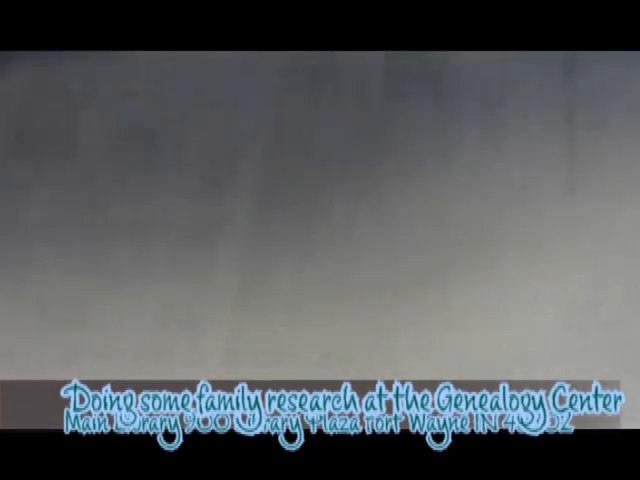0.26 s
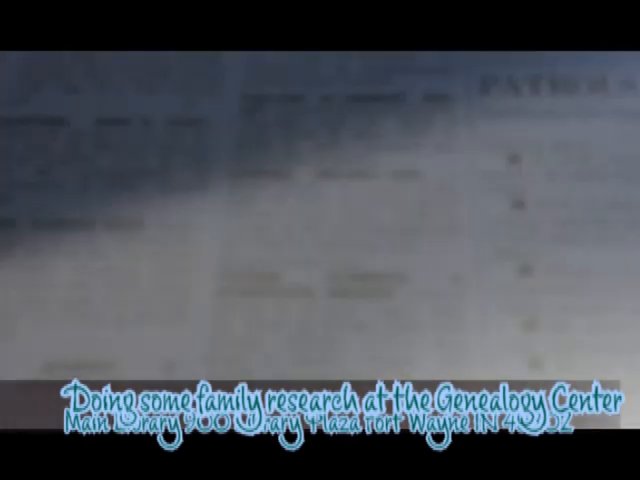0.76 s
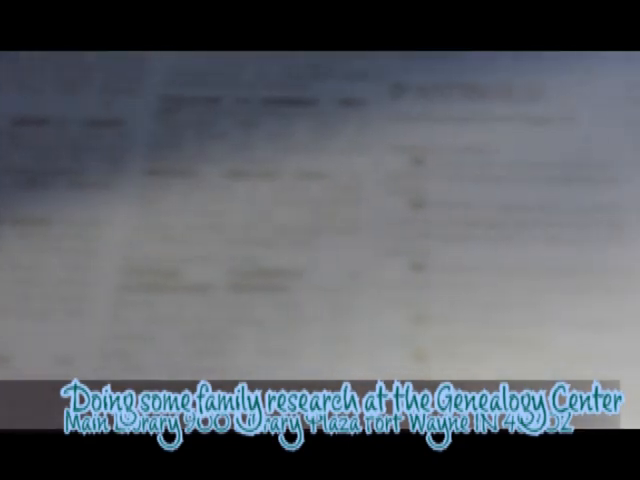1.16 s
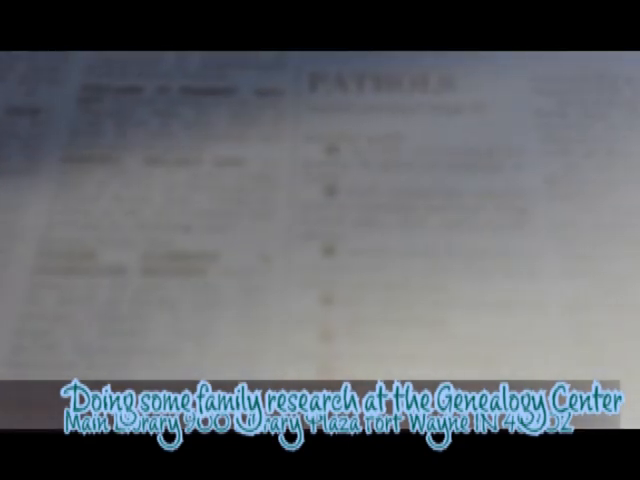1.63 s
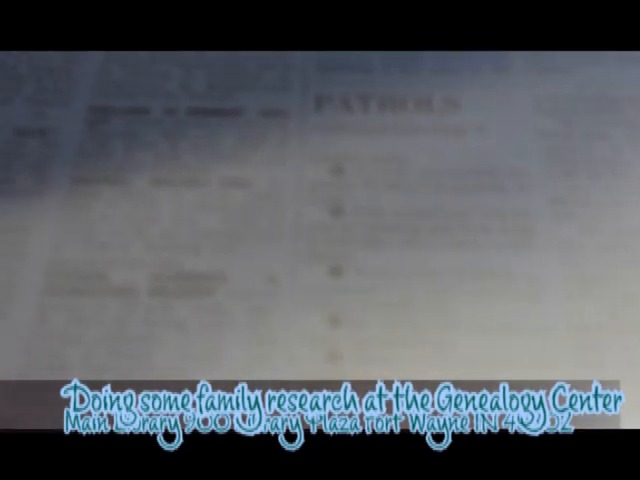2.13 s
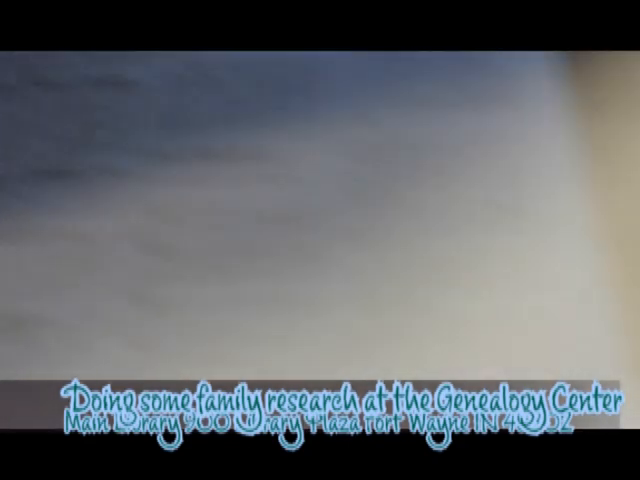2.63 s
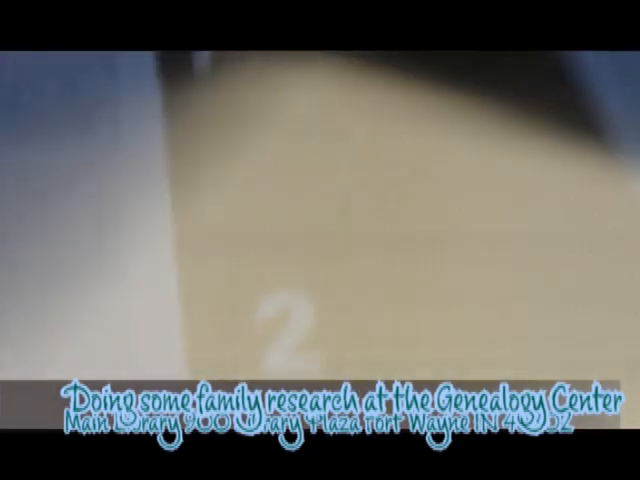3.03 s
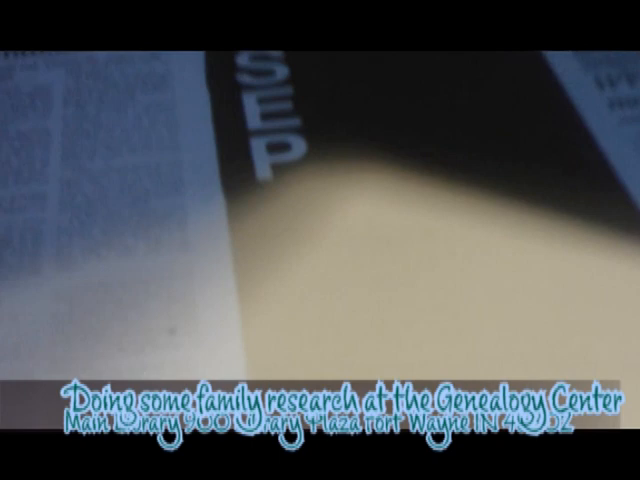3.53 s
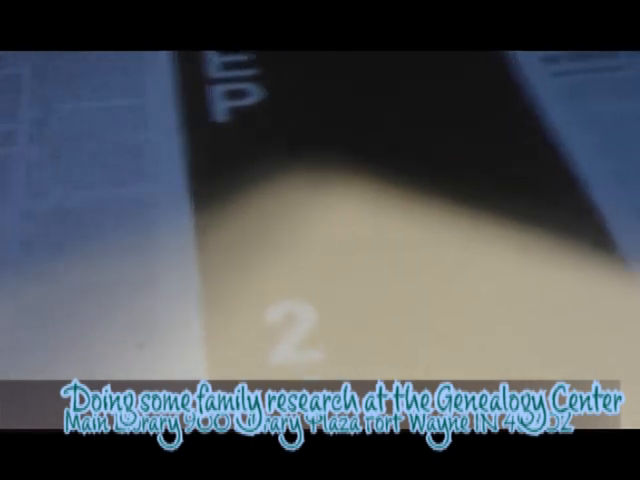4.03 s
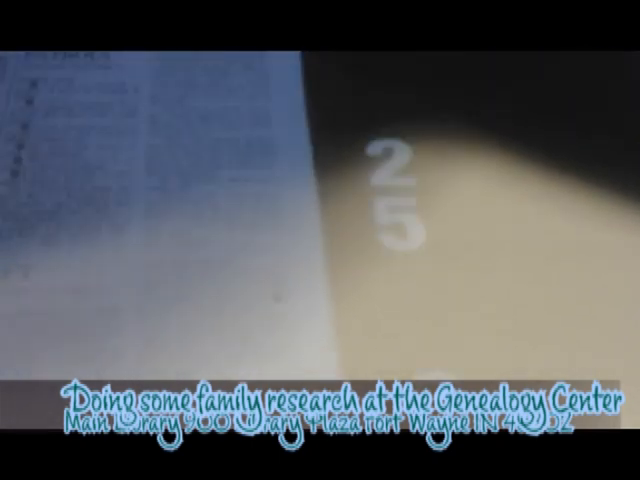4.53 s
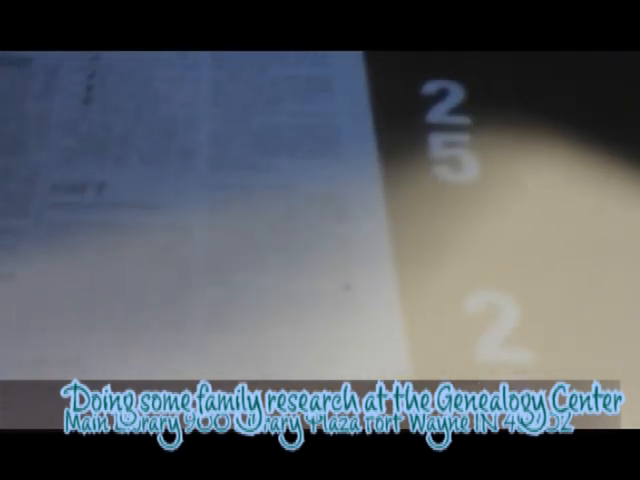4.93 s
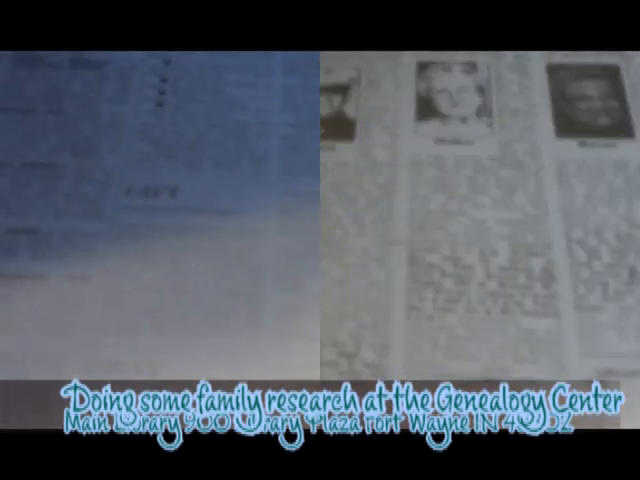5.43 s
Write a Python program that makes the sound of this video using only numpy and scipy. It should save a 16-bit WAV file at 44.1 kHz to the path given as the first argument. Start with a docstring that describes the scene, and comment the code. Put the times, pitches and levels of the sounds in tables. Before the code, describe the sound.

A microfilm reader is handled close to the microphone in a quiet room, over a faint steady fan, motor hum and thin pulsing whine. At about 0.3 seconds its plastic lever snaps back sharply, followed by small knocks and soft rubbing of a hand on the casing. Light finger ticks continue, with a soft carriage bump at 1.4 seconds and a short slide around 2.3. The carriage bumps hollowly at 3.4 and 3.6 seconds. Fingers rub and scuff from about 4.3 to 4.8. Just after 5 seconds the carriage slides again and a stiff switch clicks, then clacks over onto a ringing sprung latch at 5.3, the loudest moment, slightly overloading. The sound drops out briefly at 5.4 seconds, returning with a second lever snap at 5.5, a small button tap at 5.6 and a last light click.

```python
"""A microfilm reader, close to the microphone in a quiet room: its plastic lever snaps back twice and
a stiff switch clacks over onto a sprung latch, each blow ringing the part and its hollow casing.
Between the snaps a hand rubs and ticks on the plastic and the film carriage slides and bumps.
Under it all lie a fan, a motor hum and a faint pulsing whine. The hardest clack overloads,
and the sound drops out for a moment just before the second snap of the lever."""
import sys
import numpy as np
from scipy import signal
from scipy.fft import rfft, irfft
from scipy.io import wavfile

SR = 44100
rng = np.random.default_rng(int(sys.argv[2]) if len(sys.argv) > 2 else 0)


def master(y):
    """Save y as 16-bit WAV."""
    cut = np.clip(np.atleast_2d(y).T, -1, 1)
    pcm = np.round(cut * 32767)  # scale
    wavfile.write(sys.argv[1], SR, pcm.astype(np.int16))


N = 250047
TIME = np.arange(N) / SR

# Air noise of the fan. Each row: frequency in Hz, relative level in dB.
FAN_SPECTRUM = [(24, -63), (40, -22.5), (86, -12.5), (110, -8), (182, -5), (280, -8), (402, -9),
                (499, -20.5), (536, -6.5), (650, -16.5), (2010, -25), (2500, -24), (4340, -28.5),
                (12500, -33.5), (16200, -50.5), (22000, -120)]
# Hum of its motor. Each row: frequency in Hz, level in dB.
HUM_LINES = [(119, -68.5), (178, -67), (360, -70), (403, -70), (538, -86.5)]

# Resonances of the reader's parts. Each row: frequency in Hz, width in Hz, relative level in dB.
PLASTIC_MODES = [(687, 130, 4), (1628, 170, 7.5), (2608, 370, 8.5), (3030, 220, -8), (3274, 430, -5),
                 (4800, 330, -6.5), (6700, 1000, -43), (11130, 3500, -27.5)]
FILM_MODES = [(3640, 400, 4), (4830, 1100, 3), (6500, 750, 0.5), (8860, 4400, -8.5), (10700, 1500, -11)]
CASING_MODES = [(215, 280, 0), (428, 91, -0.4), (670, 400, 0.77)]  # the hollow shell behind the controls
LEVER_MODES = [(385, 45, -6), (835, 123, -1), (961, 61, -5), (1405, 124, 0), (1600, 210, -14),
               (2464, 62, -8), (2593, 77, -11), (3352, 146, -12), (3534, 87, -23), (5539, 405, -26),
               (6363, 340, -26), (6667, 121, -32), (7489, 1200, -36), (10435, 1200, -36), (11339, 179, -45)]
CARRIAGE_MODES = [(439, 17, 2), (487, 28, 2), (572, 42, -3), (640, 13, -13), (1295, 300, -14),
                  (1520, 290, -19.5), (2515, 140, -14), (3840, 680, -24.5), (5200, 340, -28)]
STAND_MODES = [(102, 25, 2), (163, 35, 2), (231, 92, 7.1), (346, 120, 2.7)]  # under the carriage
RAIL_MODES = [(441, 38, 5), (650, 96, 2), (1500, 57, -6), (1640, 90, -4), (2640, 530, -9), (3240, 410, -20),
              (4080, 220, -15), (5320, 390, -22.5), (6100, 830, -27)]  # the carriage while it slides
SWITCH_MODES = [(419, 307, -12), (696, 602, -4), (1688, 1064, -8), (1500, 110, -6), (2520, 150, 3),
                (2800, 250, 0), (3270, 120, -7), (3912, 283, -27), (4978, 289, -10), (5941, 166, -25),
                (7479, 90, -29), (10230, 1200, -37)]
LATCH_MODES = [(767, 47, -5), (1505, 60, 1), (1756, 45, -3), (2010, 80, -2), (2472, 45, -6),
               (2720, 130, -4), (3000, 345, -1), (3627, 89, -10), (4299, 243, -15), (4679, 45, -14),
               (5669, 45, -12), (6373, 161, -11), (6734, 92, -20), (7647, 70, -12), (10924, 174, -20),
               (11478, 285, -25)]
SPRING_MODES = [(1470, 27, -18), (2850, 44, 8), (7800, 25, -12.5), (11800, 18, -7.5)]
BUTTON_MODES = [(820, 137, 5.5), (2550, 210, -11), (5850, 1600, -19.5), (7200, 470, -18), (9300, 820, -51)]

# Strokes of the hand. Each row: start, rise, hold and fall in seconds, level in dB,
# then casing rumble and film hiss in dB relative to that level.
HAND_STROKES = [(0.034, 0.13, 0.23, 0.18, -61.5, -3.5, -0.5), (0.428, 0.12, 0.19, 0.21, -50.5, -9, -14),
                (0.944, .2, 0.05, 0.24, -69.5, -4, -16), (2.241, 0.128, 0.029, 0.026, -48.5, -20, -17),
                (2.522, 0.27, 0.056, .28, -57.5, 0.5, -3.5), (4.342, .11, .01, 0.14, -57, -9, -27),
                (4.511, 0.1, 0.24, 0.11, -56, -2, -20), (4.972, .07, 0.036, 0.066, -59.5, -1.5, -15),
                (5.096, 0.18, 0.059, 0.04, -51, 6.5, -7), (5.526, 0.14, .04, 0.055, -61, 4, -20)]
# Runs of the carriage. Each row: start, rise, hold and fall in seconds, level in dB, relative rumble in dB.
CARRIAGE_RUNS = [(2.065, 0.259, 0.066, 0.055, -44, -15), (5.093, 0.14, .008, 0.0094, -40.5, -21.5)]
# Fingers catching on the plastic. Each row: start in seconds, level in dB over 10 ms, chatter in seconds.
FINGER_SCUFFS = [(.206, -53.5, .0027), (.366, -50, 0.0044), (0.867, -50, 0.0012), (.878, -51, 0.0026),
                 (1.027, -51, 0.00039), (1.708, -56, 0.0023), (2.1328, -51.5, 0.0022),
                 (2.3713, -45, 0.0016), (2.8525, -52, 0.0019), (3.013, -56.5, 0.00068),
                 (3.366, -43, 0.0031), (3.397, -42.5, 0.007), (3.582, -51, 0.0024), (3.811, -48.5, 0.0022),
                 (4.0642, -53, 0.0051), (4.61, -47, 0.0032), (4.644, -43.5, 0.0047), (4.675, -40, 0.0057),
                 (4.762, -39.5, 0.0049), (4.825, -49, 0.011)]

# Ticks, knocks and snaps. Each row: start in seconds, level in dB over 10 ms.
NAIL_TICKS = [(0.2375, -47), (1.4424, -64), (1.66, -61)]
LEVER_KNOCKS = [(0.2442, -50.5), (.3795, -46.5), (0.4126, -38), (1.0752, -52), (5.2235, -40), (5.3195, -40),
                (5.332, -41.5)]
LEVER_SNAPS = [(0.2825, -16.5), (5.4996, -18)]

# Blows on each part. Each row: start in seconds, level in dB over 10 ms, hardness as a treble cutoff
# in Hz, thud of the mount in dB relative to the clack, chatter in seconds.
CARRIAGE_BUMPS = [(1.3902, -42.5, 8000, -29, 0.0031), (1.396, -41.5, 654, -27, 0.019),
                  (3.378, -30.5, 4500, -10, 0.0058), (3.39, -38, 2000, 8, 0.019),
                  (3.582, -38, 2200, 1.5, 0.011), (3.62, -38.5, 925, 7, 0.017)]
SWITCH_CLACKS = [(5.1463, -38, 3830, -33, 0.0022), (5.2022, -41, 12000, -7, 0.00048),
                 (5.2236, -23, 5970, -14, 0.00013), (5.2695, -29, 12170, -18, 0.00075),
                 (5.2724, -15.5, 13000, -16.5, 0.001), (5.6452, -43, 6000, -32, 0.00092)]
LATCH_HITS = [(5.2853, -21.5, 3595, -10, 0.0026), (5.2925, -24.5, 15250, -13, 0.0012),
              (5.2936, -9, 15260, -35, 0.00094), (5.2977, -21.5, 8100, -17.5, 0.000091),
              (5.3005, -31.5, 12070, -13.5, 0.0024), (5.3175, -34.5, 3040, -13, 0.0043)]
BUTTON_TAPS = [(5.598, -30.5, 12000, -34, 0.000092)]

# Reverberation of the room. Each row: frequency in Hz, time to fall 60 dB in seconds.
ROOM_DECAY = [(100, .45), (1000, 1), (4000, 0.93), (12000, 0.45)]


def amp(db):
    """Decibels to gain."""
    return 10 ** (np.asarray(db) / 20)


def unit(x):
    """Scales to rms 1."""
    return x / np.sqrt(np.mean(x ** 2) + 1e-20)


def over_10ms(x):
    """Scales a short sound to the energy of 10 ms at rms 1."""
    return unit(x) * np.sqrt(SR / 100 / len(x))


def curve_at(points, hz):
    """Reads a table of (Hz, value) on a log-frequency axis."""
    freqs, values = np.transpose(points)
    return np.interp(np.log(hz + 1), np.log(freqs), values)


def add(mix, start, sound):
    """Mixes a sound in at start seconds."""
    part = mix[round(start * SR):][:len(sound)]
    part += sound[:len(part)]


def filtered(x, hz, kind, order=2):
    """Causal low-pass or high-pass."""
    return signal.sosfilt(signal.butter(order, min(hz, SR / 2 - 1000), kind, fs=SR, output="sos"), x)


def drift(top_hz):
    """Random motion of rms 1, no faster than top_hz."""
    return unit(irfft(rfft(rng.standard_normal(N)) * (np.fft.rfftfreq(N, 1 / SR) < top_hz), N))


def ring(modes, build_cycles=.4, size=12288):
    """Impulse response of a part: damped modes that each take a moment to build up."""
    t = np.arange(size) / SR
    out = np.zeros(size)
    for hz, width, db in modes:
        envelope = np.exp(-np.pi * width * t) * (1 - np.exp(-t * hz / build_cycles))
        out += amp(db) * width * envelope * np.cos(2 * np.pi * hz * t)
    return out


def choked(body, hold_s=.008):
    """A finger resting on the part chokes its ring."""
    t = np.arange(len(body)) / SR
    return unit(body * np.exp(-(t / hold_s) ** 2))


def strike(blows, body, mount_modes=CASING_MODES):
    """A short blow is one clean impact, a long one a chatter of slips; soft contact dulls the treble."""
    out, t = np.zeros(N), np.arange(len(body)) / SR
    mount = ring(mount_modes, build_cycles=1.0)
    for start, db, hard_hz, thud_db, chatter_s in blows:
        age = t / max(chatter_s, 1 / SR)
        force = .11 * rng.standard_normal(len(t)) * age * np.exp(-age)
        force[0] = np.exp(-chatter_s / 0.0019)  # the clean impact
        clack = filtered(signal.fftconvolve(force, body)[:len(t)], hard_hz, "low")
        thud = signal.fftconvolve(force, mount)[:len(t)]
        add(out, start, amp(db) * over_10ms(unit(clack) + amp(thud_db) * unit(thud)))
    return out


def stroke(start, rise, hold, fall, db, power=1.88):
    """Gain over time of one movement: it gathers speed, holds it and comes to rest."""
    rising = (TIME - start) / rise
    falling = 1 - (TIME - start - rise - hold) / fall
    return amp(db) * np.clip(np.minimum(rising, falling), 0, 1) ** power


def rubbing(gain, rumble_gain, body, slips_per_s=9000, spread_db=0.5, rumble_hz=460, width_hz=300):
    """Dense tiny slips excite a part and set the casing rumbling, each with its own gain over time."""
    slips = rng.standard_normal(N) * amp(spread_db * rng.standard_normal(N))
    slips *= rng.random(N) < slips_per_s / SR
    surface = unit(signal.fftconvolve(slips, body)[:N])
    casing = signal.fftconvolve(slips, ring([(rumble_hz, width_hz, 0)]))[:N]
    rumble = unit(filtered(casing, 230, "high"))
    flicker = amp(drift(50))  # about 1 dB
    return flicker * (gain * surface + rumble_gain * rumble)


def fan(air_db=-57, waver_db=2, wander_rad=0.94):
    """Steady air noise with the wavering hum of the motor in it."""
    spectrum = amp(curve_at(FAN_SPECTRUM, np.fft.rfftfreq(N, 1 / SR)))
    air = unit(irfft(rfft(rng.standard_normal(N)) * spectrum, N))
    hum = sum(amp(db + waver_db * drift(8.1)) * np.sin(2 * np.pi * hz * TIME + wander_rad * drift(4.7))
              for hz, db in HUM_LINES)
    return amp(air_db) * air + np.sqrt(2) * hum


def whine(hz=5980, db=-78, pips_per_s=34, duty=0.32, waver_db=2, wander_rad=0.73):
    """A faint electronic whine that comes in short, regular pips."""
    cycle = (TIME * pips_per_s - .1) % 1
    pips = np.sqrt(np.maximum(np.sin(np.pi * np.minimum(cycle / duty, 1)), 0))
    gain = amp(db + waver_db * drift(4))
    tone = np.sin(2 * np.pi * hz * TIME + wander_rad * drift(90))
    return gain * unit(pips * tone)


def hand(rest_db=-71.5, rest_rumble_db=-66.5):
    """Each stroke rubs the plastic, rumbles the casing and draws the film through its guides."""
    rub, rumble, film = amp(rest_db), amp(rest_rumble_db), 0  # the hand never lies quite still
    for *shape, rumble_db, film_db in HAND_STROKES:
        gain = stroke(*shape)
        rub += gain
        rumble += gain * amp(rumble_db)
        film += gain * amp(film_db)
    plastic = rubbing(rub, rumble, ring(PLASTIC_MODES, build_cycles=0.74))
    return plastic + rubbing(film, 0, ring(FILM_MODES))


def fingers(hard_hz=8000, reference_db=-47, db_per_octave=4.5, thud_db=-7):
    """Fingertips catch on the plastic; a firmer finger flattens and sounds duller."""
    blows = [(start, db, hard_hz * 2 ** ((reference_db - db) / db_per_octave), thud_db, chatter_s)
             for start, db, chatter_s in FINGER_SCUFFS]
    return strike(blows, ring(PLASTIC_MODES))


def fingernail(decay_s=0.0027, low_cut_hz=4200, size=1024):
    """Ticks too light to ring anything: only a spit of treble."""
    out, t = np.zeros(N), np.arange(size) / SR
    for start, db in NAIL_TICKS:
        burst = rng.standard_normal(size) * np.exp(-t / decay_s)
        add(out, start, amp(db) * over_10ms(filtered(burst, low_cut_hz, "high")))
    return out


def lever(buzz_after_s=0.00184, buzz_db=-15.5, bounce_after_s=.0145, bounce_db=-20, loss_db=6.5):
    """The lever snaps back, buzzes against its stop and bounces twice; lighter touches only knock."""
    # Each contact: hardness in Hz, relative thud in dB, chatter in seconds.
    snap, buzz, knock = (14400, -19, .00007), (6100, -19, 0.002), (1000, 19, .0005)
    bounce = np.arange(2)
    delays = bounce_after_s * np.cumsum(.77 ** bounce)  # the gap between bounces shrinks
    blows, knocks = [], list(LEVER_KNOCKS)
    for start, db in LEVER_SNAPS:
        blows += [(start, db, *snap), (start + buzz_after_s, db + buzz_db, *buzz)]
        knocks += zip(start + delays, db + bounce_db - loss_db * bounce)
    blows += [(start, db, *knock) for start, db in knocks]
    return strike(blows, choked(ring(LEVER_MODES)))


def carriage(settle_db=-17, settle_s=0.18):
    """The heavy film carriage slides on its rail and bumps on its stand; the casing rumbles on."""
    slide = sum(stroke(*shape) for *shape, _ in CARRIAGE_RUNS)
    rumble = sum(stroke(*shape) * amp(rumble_db) for *shape, rumble_db in CARRIAGE_RUNS)
    settling = np.max([amp(db + settle_db) * (TIME > start) * np.exp(-abs(TIME - start) / settle_s)
                       for start, db, *_ in CARRIAGE_BUMPS], axis=0)
    bumps = strike(CARRIAGE_BUMPS, ring(CARRIAGE_MODES), STAND_MODES)
    return bumps + rubbing(slide, rumble + settling, ring(RAIL_MODES, build_cycles=1.7))


def switch():
    """The stiff switch clicks lightly, then clacks over and thuds into the casing."""
    return strike(SWITCH_CLACKS, ring(SWITCH_MODES))


def latch(spring_db=-27):
    """The switch's latch scrapes, drops home and rebounds; its spring rings on behind it."""
    body = choked(ring(LATCH_MODES)) + amp(spring_db) * unit(ring(SPRING_MODES))
    return strike(LATCH_HITS, body)


def button():
    """One hard tap rings a small button."""
    return strike(BUTTON_TAPS, ring(BUTTON_MODES))


def room(x, build_s=0.0023):
    """The room returns a diffuse tail that lasts longest in the midrange."""
    hz, t, noise = signal.stft(rng.standard_normal(SR // 2), SR, nperseg=256)
    decay = amp(-60 * t / curve_at(ROOM_DECAY, hz)[:, None])
    onset = 1 - np.exp(-t / build_s)
    tail = signal.istft(noise * decay * onset, SR)[1]
    return signal.fftconvolve(x, tail / np.linalg.norm(tail))[:N]


def scene(controls_cut_hz=170, low_cut_hz=70, room_db=-38.5):
    """Close handling with very little room, over the machine's steady noise; both channels alike."""
    controls = lever() + switch() + latch() + button() + fingers()
    controls = filtered(controls, controls_cut_hz, "high", order=3)  # small parts radiate little bass
    near = filtered(controls + carriage() + hand() + fingernail(), low_cut_hz, "high", order=4)
    mono = near + amp(room_db) * room(near) + fan() + whine()
    return np.array([mono, mono])


def record(dry, ceiling=0.92, dropout_s=(5.411, 5.497), top_hz=12850):
    """The hardest clack overloads, the sound drops out once, and the top treble is cut off."""
    live = (TIME < dropout_s[0]) | (TIME > dropout_s[1])
    clipped = np.clip(dry, -ceiling, ceiling) * live
    low_pass = signal.firwin(255, top_hz, window=("kaiser", 9), fs=SR)
    return signal.oaconvolve(clipped, low_pass[None], "same")


dry = scene()
out = record(dry)
master(out)
```